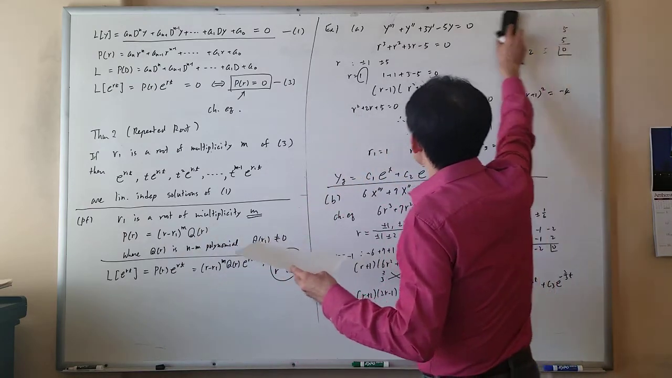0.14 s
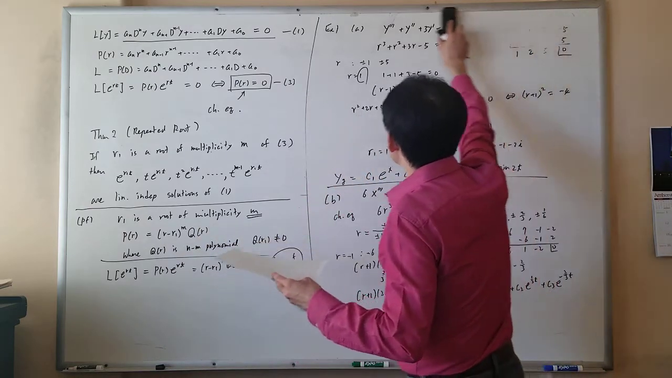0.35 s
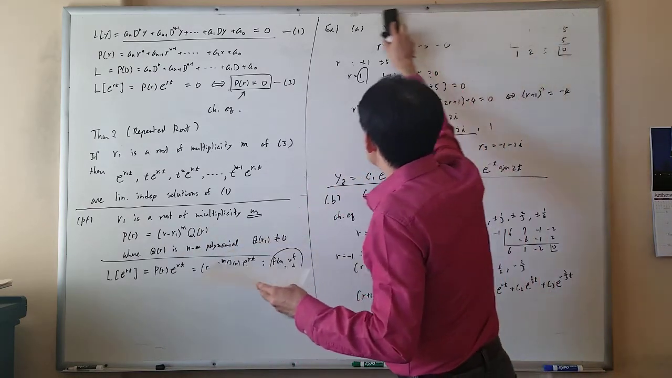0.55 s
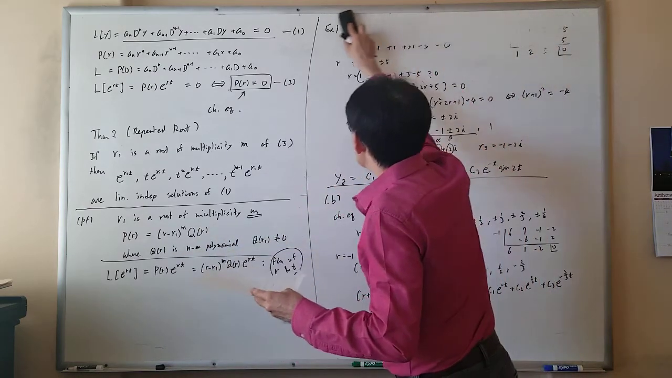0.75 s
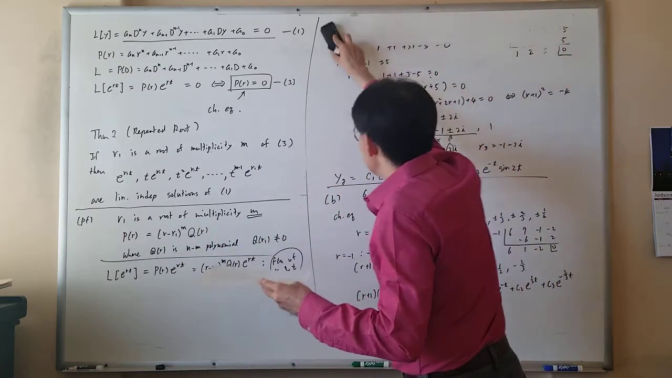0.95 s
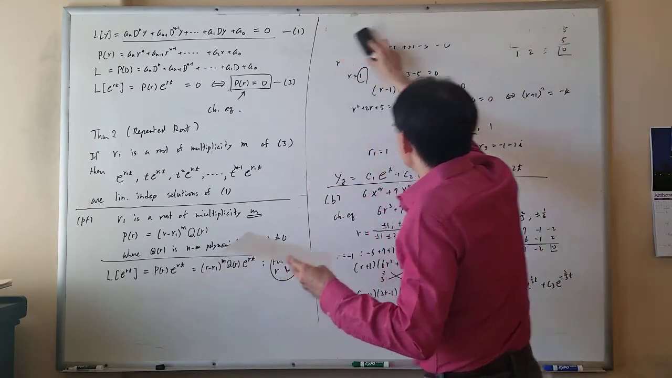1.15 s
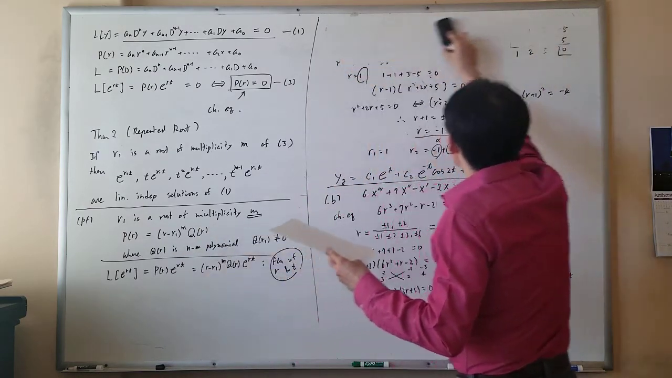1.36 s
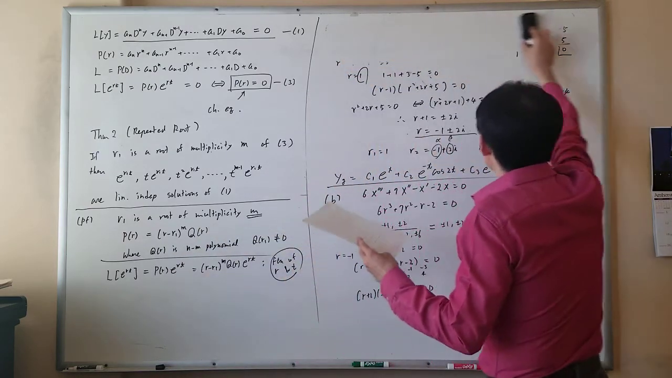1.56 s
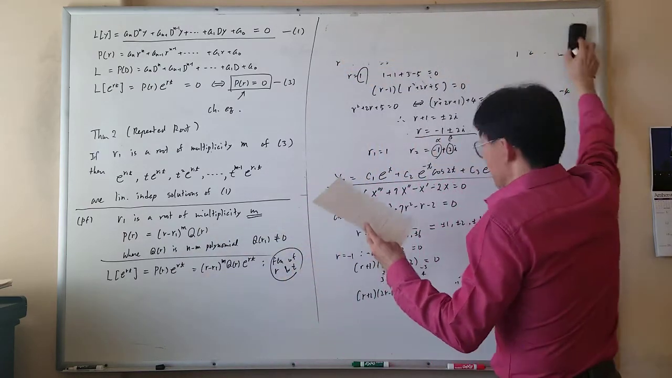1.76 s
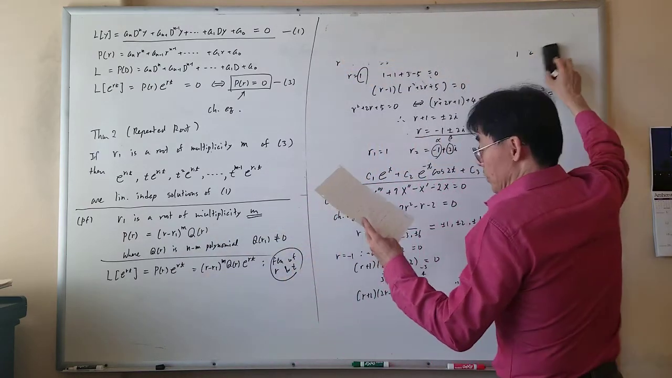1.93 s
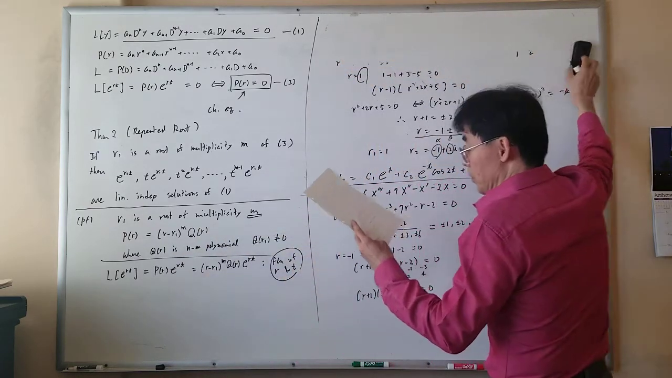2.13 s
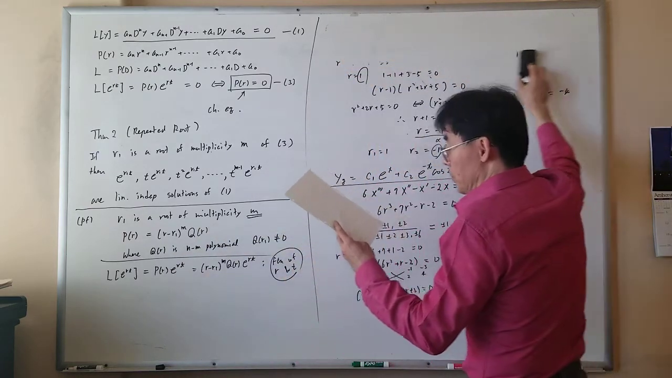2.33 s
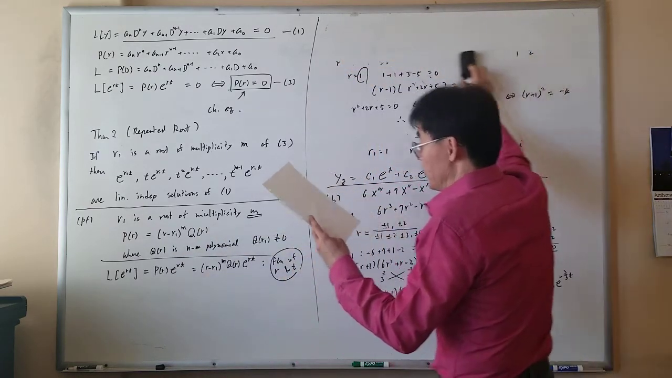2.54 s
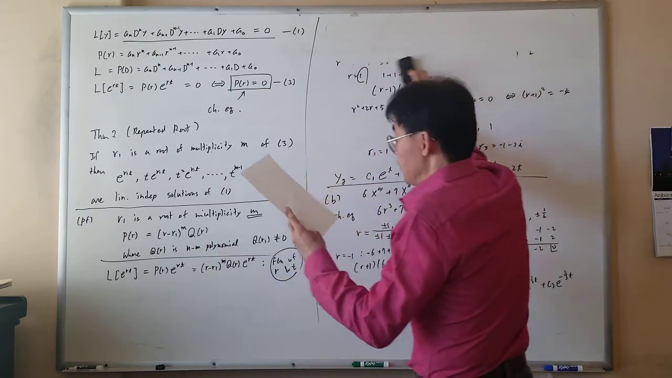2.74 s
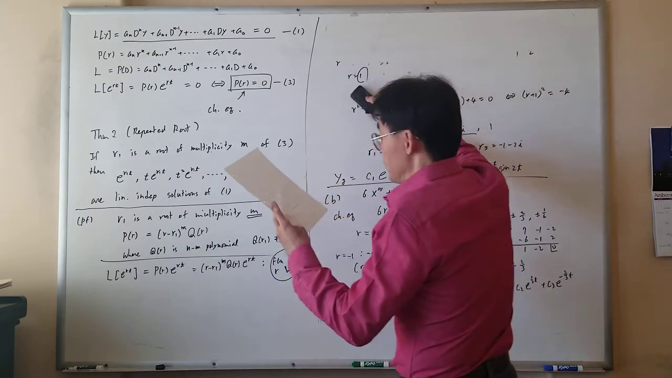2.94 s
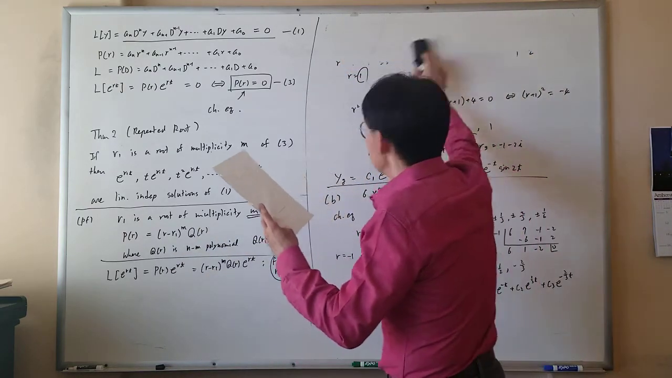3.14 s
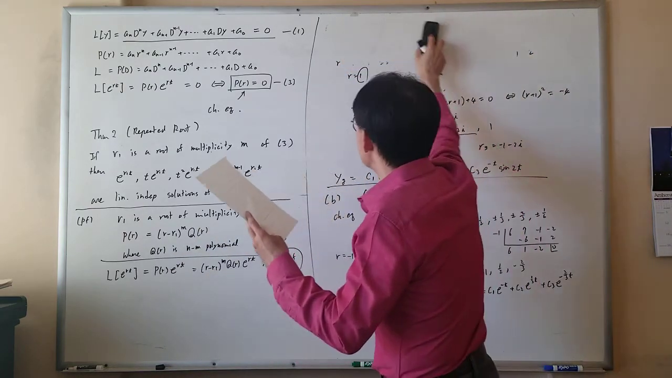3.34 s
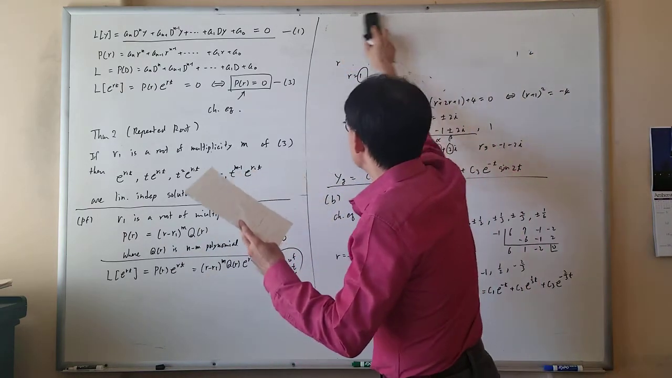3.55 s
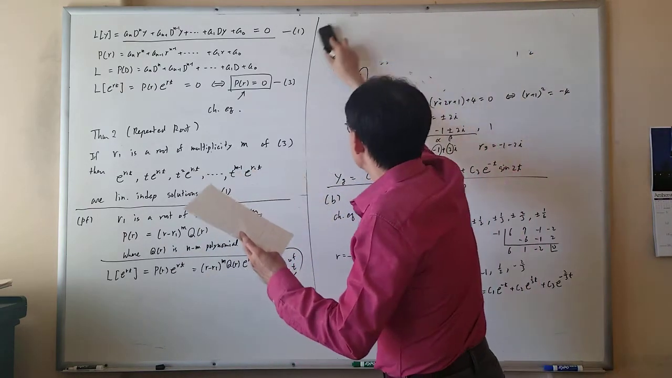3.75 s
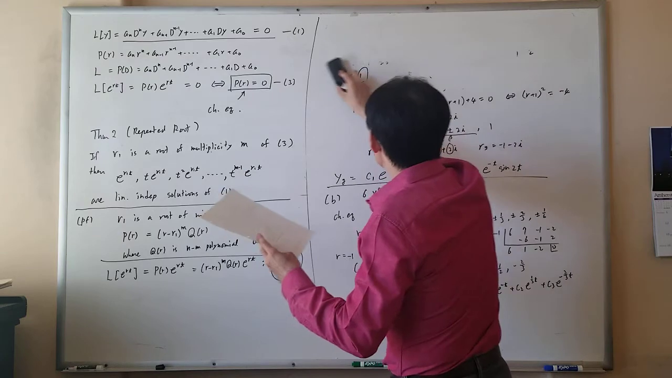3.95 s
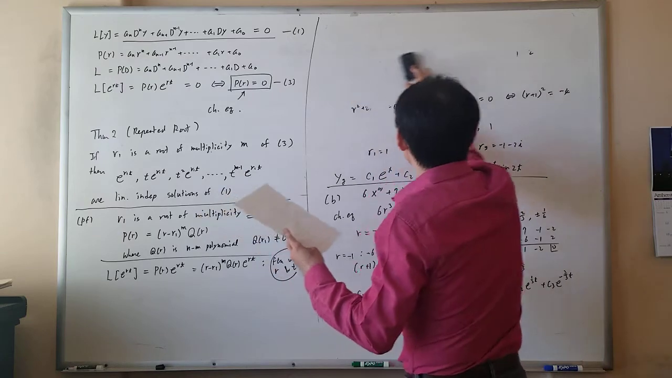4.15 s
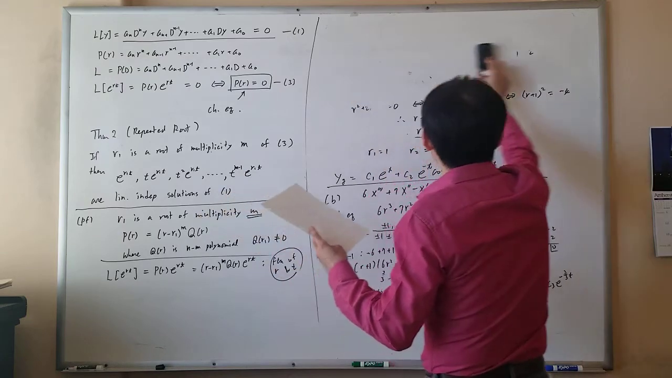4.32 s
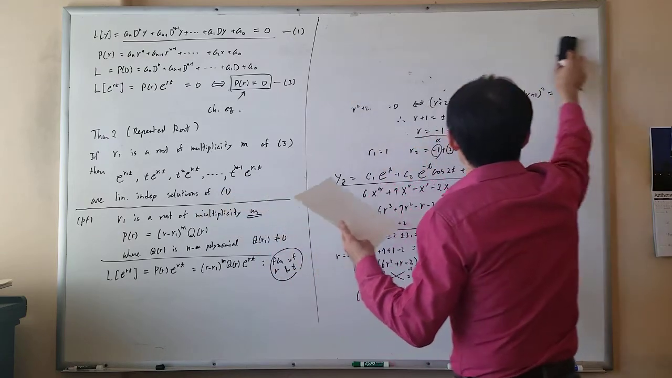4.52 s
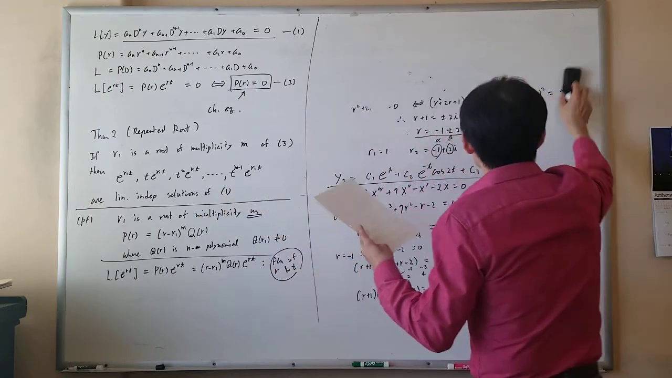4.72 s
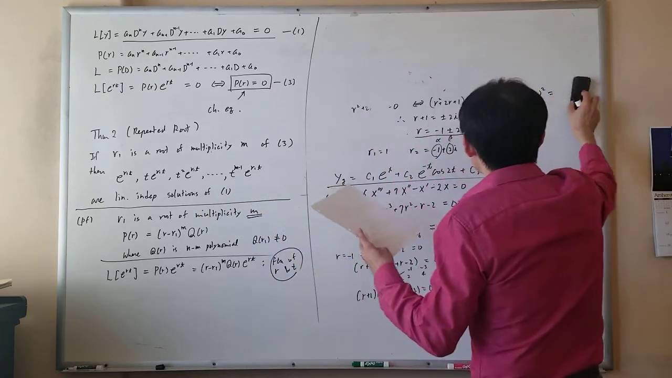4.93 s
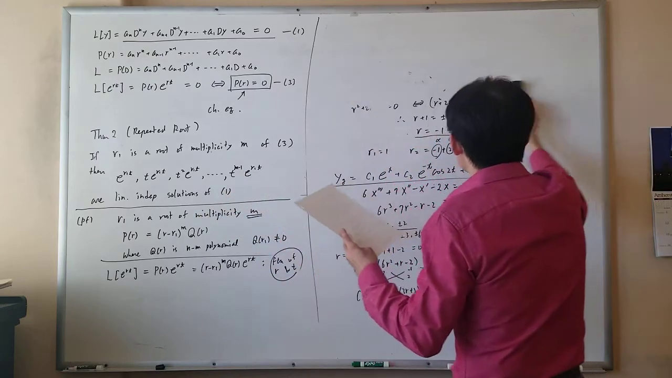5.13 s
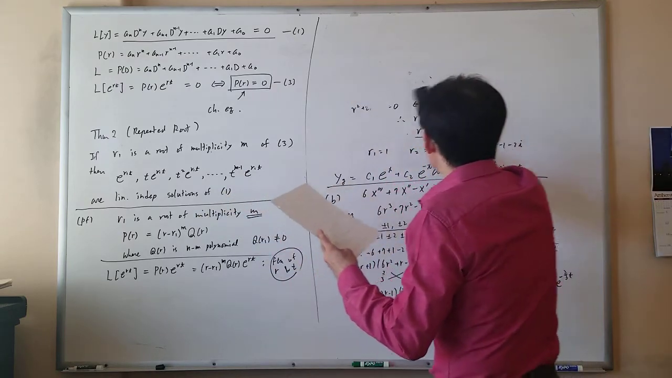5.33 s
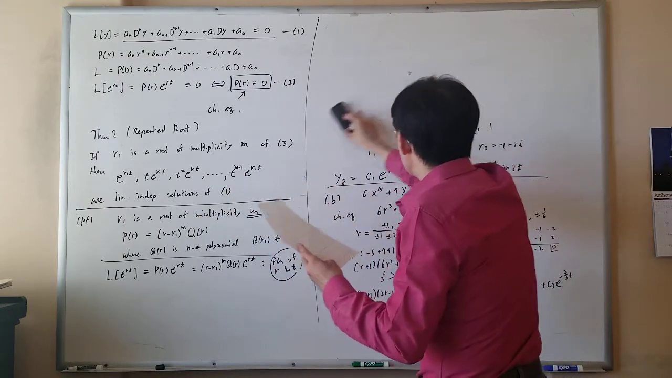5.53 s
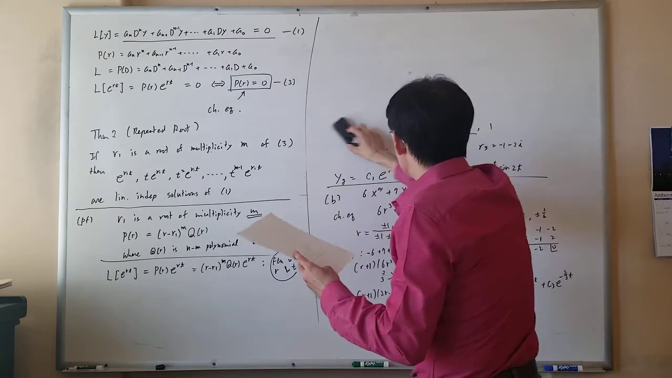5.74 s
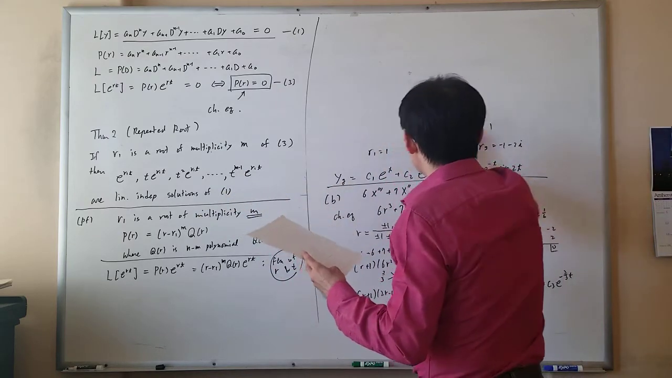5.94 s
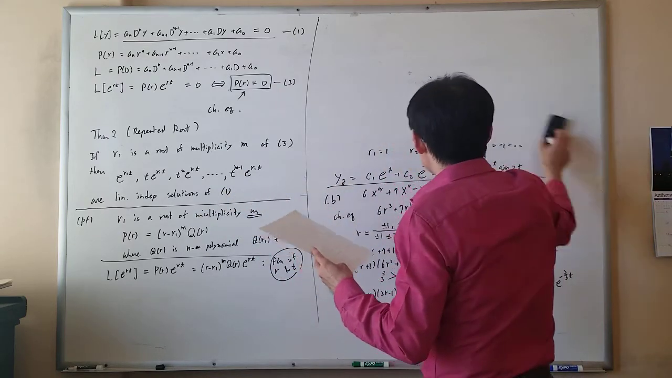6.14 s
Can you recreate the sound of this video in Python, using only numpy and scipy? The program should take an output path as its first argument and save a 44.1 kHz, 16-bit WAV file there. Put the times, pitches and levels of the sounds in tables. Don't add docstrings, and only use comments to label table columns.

```python
import sys
import numpy as np
from scipy import signal
from scipy.fft import rfft, irfft, next_fast_len
from scipy.io import wavfile
from scipy.ndimage import uniform_filter1d, map_coordinates

SR = 44100
rng = np.random.default_rng(int(sys.argv[2]) if len(sys.argv) > 2 else 0)


def decibels_to_gain(level_db):
    exponent = np.asarray(level_db, float) / 20
    return 10 ** exponent


def pcm_store(signal):
    levels = np.round(np.clip(np.atleast_2d(signal), -1, 1) * 32767)
    wavfile.write(sys.argv[1], SR, levels.astype(np.int16).T)


N = 272538
LANDING_S = 1.0045

# frequency in
# Hz, level in dB per Hz.
HISS_COLOUR = [(1000, -20), (1700, -9), (2450, -1.5), (3000, -4), (4600, -2.5), (5470, -3.5), (7000, -3.5),
               (8100, -6.5), (8600, -11), (9500, -12.5), (11500, -10), (13000, -15), (15800, -18.5)]
# frequency in Hz, level in dB per Hz.
BOARD_COLOUR = [(250, -12.5), (400, -10), (580, -4), (1100, -2), (1600, -2.5), (2600, -10.5)]
# start in seconds, length in seconds, felt level in dB, board level in dB,
# moment of greatest speed as a share of the length.
PUSHES = [(-.05, 1.036, -54.5, -70, 0.78), (0.865, 0.3, -60, -58.5, 0.36), (1.097, 0.61, -49, -66.5, 0.46),
          (1.402, .45, -49.5, -62, .58), (1.7, 0.54, -58.5, -72.5, 0.34), (2.124, 0.57, -54, -70, 0.56),
          (2.485, 0.61, -54, -72, 0.29), (2.944, 0.41, -57.5, -72, 0.42), (3.248, 0.64, -55, -72.5, 0.6),
          (3.683, 0.53, -53, -70, 0.49), (3.983, .69, -46, -64, 0.34), (4.544, 0.47, -56, -69.5, 0.51),
          (4.923, 0.38, -56, -71, .55), (5.1, 0.64, -48, -65.5, 0.51), (5.6, .3, -56, -70, 0.54),
          (5.722, .54, -47, -65, 0.51)]
# length in seconds, felt level in dB, board level in dB.
LANDING_PUSH = (.28, -49, -59.5)
# frequency in Hz, left minus right in dB.
PORT_DIFFERENCE = [(60, 1.0), (92, 0.5), (140, 0), (210, 1), (330, 1), (500, 0), (770, 0.5), (1170, 1.5),
                   (1790, 1), (2740, 1.5), (4190, 2), (6410, 5), (9810, -1), (15000, 1)]
# frequency in Hz, likeness from 0 to 1.
LIKENESS = [(60, 0.27), (300, 0.56), (700, 0.25), (1400, 0.014)]
# time in seconds, peak in dB, pitch in Hz.
TAPS = [
    (.9745, -43, 573),
    (.985, -45, 617),
    (1.013, -48, 478),
    (1.024, -51, 560),
]
# time in seconds, peak in dB, pitch in Hz, width as a share of the pitch.
THUDS = [(.295, -48.5, 400, 0.24), (0.3, -57, 290, .4), (.285, -58, 176, 0.45), (.89, -49, 570, 0.68),
         (.94, -54.5, 294, 0.8), (.945, -60, 850, 0.34), (.98, -66, 1490, 0.23), (4.94, -59, 310, 0.4),
         (4.975, -51, 450, .5), (4.97, -63, 240, 0.78), (4.989, -59, 970, 0.32)]
# time in seconds, peak in dB, pitch in Hz.
THUMPS = [
    (.395, -57.5, 95),
    (.49, -56, 89),
    (.973, -68, 98),
    (1.987, -58, 99),
    (3.04, -63, 51),
    (5.035, -57, 97),
    (5.055, -61, 318),
    (6.01, -63, 89),
]
# frequency in Hz, level in dB rms.
FAN_HUM = [(63, -84), (95, -78), (126.5, -79), (158, -86), (190, -92.5)]
# frequency in Hz, level in dB per Hz.
RUMBLE_COLOUR = [(15, -44), (25, -10), (67, -8), (113, 1.5), (144, -1), (210, -15.5), (270, -31),
                 (460, -120)]
# frequency in Hz, level in dB per Hz.
DUCT_COLOUR = [(150, -24), (210, -2), (300, -2), (420, -2), (600, -1), (900, 0.5)]
BAND_EDGES = np.array([5040, 6010, 7700, 9450, 12030])
BAND_HABITS = [(.91, 0.039, 0.03), (0.9, -0.17, -0.35), (.99, -0.37, -0.28), (0.98, -0.037, -0.22),
               (1.08, -0.1, .05)]
# start in seconds, length in seconds, opening time in seconds,
# release in dB at first, release in dB at last.
OPENINGS = [
    (-.1, 0.49, 0.11, 3.5, 10.5),
    (0.19, 0.672, 0.06, 17.5, 18),
    (1.199, 0.55, .13, 17, 16.5),
    (2.254, 0.44, 0.033, 4, 1),
    (3.443, 0.3, 0.13, 10.5, 9.5),
    (3.78, 0.3, 0.063, 9.5, 6),
    (3.956, 0.646, 0.093, 21, 20),
    (5.126, 0.53, 0.097, 21, 20),
    (5.764, 0.56, 0.11, 22.5, 22.5),
]
# start in seconds, length in seconds, band in Hz,
# side (-1 left, +1 right), share of the release withheld.
HELD_BANDS = [(.24, 0.82, 10600, -1, 0.89), (0.276, 0.66, 5400, -1, 0.66), (.22, 0.72, 13600, 1, 1.7),
              (0.797, 0.091, 8500, -1, 1.3), (5.2, 0.046, 13600, -1, .5), (1.18, .14, 8500, -1, .6),
              (1.252, 0.44, 5400, -1, 0.59), (1.28, .31, 5400, 1, .35), (1.292, .085, 6700, -1, 0.76),
              (1.62, .16, 8500, -1, 0.61), (1.64, .14, 6700, -1, 0.57), (1.66, .12, 8500, 1, 0.79),
              (3.42, 0.49, 13600, 1, 1.1), (3.42, 0.52, 10600, -1, 1.7), (3.42, 0.59, 8500, -1, 0.81),
              (3.42, 0.092, 13600, -1, .9), (3.87, .08, 13600, -1, 0.63), (3.94, .11, 8500, 1, .5),
              (5.12, .53, 5400, -1, 0.49), (5.12, .16, 13600, 1, .8), (5.12, .13, 10600, 1, .5),
              (5.12, 0.29, 5400, 1, .65), (5.528, .11, 5400, 1, .65), (5.8, 0.11, 5400, -1, 0.37)]
# start in seconds, length in seconds, band in Hz,
# side (-1 left, +1 right), lift in dB.
LEAKING_BANDS = [(.1, 0.6, 6700, 1, 2.5), (.1, 0.96, 8500, 1, 3), (.77, 0.076, 10600, 1, 1.5),
                 (0.792, 0.48, 5400, 1, 4.5), (1.22, 0.066, 13600, 1, 12.5), (1.63, .12, 13600, 1, 5),
                 (1.267, 0.34, 10600, 1, 5.5), (1.31, 0.46, 13600, -1, 5), (2.29, 0.039, 13600, -1, 10),
                 (2.327, .46, 6700, -1, 4), (2.42, 0.14, 5400, 1, 10), (2.62, 0.17, 6700, -1, 3.5),
                 (5.165, 0.023, 13600, -1, 2), (2.532, .3, 10600, 1, 14.5), (2.68, .055, 10600, -1, 10),
                 (2.71, .12, 5400, 1, 7.5), (3.41, 0.09, 5400, -1, 9), (3.51, 0.53, 10600, 1, 9.5),
                 (3.566, .14, 13600, -1, 8), (3.48, 0.25, 8500, 1, 4.5), (3.76, 0.24, 5400, 1, 3),
                 (3.96, 0.06, 13600, -1, 10), (5.6, 0.11, 8500, 1, 6), (4.74, 0.066, 5400, -1, 5.5)]


def unit(x):
    return x / np.sqrt(np.mean(x ** 2) + 1e-20)


def along(points, hz):
    f, v = np.transpose(points)
    return np.interp(np.log(hz + 1), np.log(f + 1), v)


def wobble(rate):
    knots = rng.standard_normal(int(N * rate / SR) + 4)
    return map_coordinates(knots, [np.arange(N) * rate / SR])


def filtered(x, response):
    m = next_fast_len(N + 8192)
    return irfft(rfft(x, m) * response(np.fft.rfftfreq(m, 1 / SR)), m)[..., :N]


def diffuse(pair, spectrum):
    points = [(3.7, -120), *spectrum, (21000, -69)]

    def mix(hz):
        turn = np.arccos(np.clip(along(LIKENESS, hz), -1, 1)) / 2
        return decibels_to_gain(along(points, hz)) * [np.cos(turn), np.sin(turn)]

    mid, side = filtered(pair, mix)
    return unit(np.array([mid + side, mid - side]))


def eraser():
    felt_db, board_db = rubbing()
    fine_clumps = np.array([wobble(1500), wobble(1600)])
    clumps_db = 1.02 * wobble(12) + 0.3 * wobble(250) + 0.95 * fine_clumps
    slips = unit(decibels_to_gain(clumps_db) * rng.standard_normal((2, N)))
    hiss = decibels_to_gain(felt_db + 3.5) * diffuse(slips, HISS_COLOUR)
    panel = diffuse(rng.standard_normal((2, N)), BOARD_COLOUR)
    body = decibels_to_gain(board_db + 3.0 + 1.5 * wobble(8)) * panel
    heard = filtered(hiss + body, lambda hz: decibels_to_gain(np.outer([0.5, -0.5], along(PORT_DIFFERENCE, hz) - 2)))
    place_db = 2.3
    return heard * decibels_to_gain(np.outer([0.5, -0.5], place_db))


def rubbing():
    speed_power, resting_db = 1.154, -69
    board_late = 0.13
    board_shift_db = 14
    t = np.arange(0, N, 32) / SR
    power = decibels_to_gain(2 * resting_db)
    for start, length, felt_db, board_db, fastest in [*PUSHES, (LANDING_S, *LANDING_PUSH, 0)]:
        tops = np.clip([fastest, fastest + board_late * (1 - fastest)], 0.003, 0.995)
        swell = np.array([np.interp((t - start) / length, [0, top, 1], [0, 1, 0]) for top in tops])
        speed = np.sin(np.pi / 2 * swell)
        loudness = decibels_to_gain([[felt_db], [board_db + board_shift_db]]) * speed ** speed_power
        power = power + loudness ** 2
    level_db = 10 * np.log10(power) - [[0], [board_shift_db]]
    return np.repeat(level_db, 32, axis=1)[:, :N]


def slap():
    t = np.maximum(np.arange(N) / SR - LANDING_S, 0)
    burst = (t > 0) * decibels_to_gain(-36 - 60 * t / 0.013) * rng.standard_normal((2, N))
    return filtered(burst, lambda hz: 1 / (1 + (2800 / (hz + 1)) ** 4) / (1 + (hz / 8500) ** 6))


def knocks():
    # width as a share of pitch (thuds have their own), rise s, time to fall 60 dB s
    every = [(*row, 0.042, 0.0013, 0.088) for row in TAPS]
    every += [(*row, 0.051, 0.38) for row in THUDS]
    every += [(*row, 0.08, 0.013, 0.34) for row in THUMPS]
    out = np.zeros((2, N + SR))
    t = np.arange(SR // 3) / SR
    for start, db, hz, width, rise, t60 in every:
        own, shared = rng.standard_normal((2, 2, 250)) + 1j * rng.standard_normal((2, 2, 250))
        echoes = np.sqrt(width) * (0.31 * own + 1.46 * shared[0]) + 0.83 * (1 - width)
        spread = np.array([np.interp(t * hz * width, np.arange(250), e) for e in echoes])
        ring = np.real(spread * np.exp(2j * np.pi * hz * t))
        shape = (1 - np.exp(-(t / rise) ** 2)) * decibels_to_gain(db - 60 * t / t60)
        out[:, round(start * SR):][:, :len(t)] += ring * shape
    return out[:, :N] * decibels_to_gain([[1.2], [-1.2]])


def ventilation():
    t = np.arange(N) / SR
    fan = np.zeros(N)
    for hz, db in FAN_HUM:
        level = decibels_to_gain(db + 1.0 + 4.3 * wobble(4.98))
        fan += level * np.sin(2 * np.pi * hz * t + 0.66 * wobble(4.5))
    rumble = diffuse(rng.standard_normal((2, N)), RUMBLE_COLOUR[1:-1])
    rumble = decibels_to_gain(-74.5 + 2 * wobble(3.3)) * rumble
    duct = diffuse(rng.standard_normal((2, N)), DUCT_COLOUR)
    duct = decibels_to_gain(-79.0 + 1.1 * wobble(4.7)) * duct
    lull_db = -11 * np.exp(-((t - 0.18) / 0.11) ** 2)
    return decibels_to_gain(lull_db) * (fan + rumble) + duct


def scene():
    return eraser() + slap() + knocks() + ventilation()


def release(late, early):
    shut_s = 0.089
    t = np.arange(N) / SR
    landing = (LANDING_S, 0.23, 0, 13.5, 16)
    ramps = []
    for start, length, opening, first_db, last_db in [*OPENINGS, landing]:
        drift_s = max(length - (1 + late) * opening - (1 + early) * shut_s, 0)
        corners = np.cumsum([start + late * opening, opening, drift_s, shut_s])
        ramps.append(np.interp(t, corners, [0, first_db, last_db, 0]))
    return np.max(ramps, axis=0)


def spans(rows):
    out = np.zeros((len(BAND_EDGES), 2, N))
    for start, length, hz, side, value in rows:
        band = np.searchsorted(BAND_EDGES, hz) - 1
        out[band, int(side > 0), round(start * SR):round((start + length) * SR)] += value
    return uniform_filter1d(out, round(0.024 * SR))


def suppressor(x):
    edges = np.asarray(BAND_EDGES)
    common_db = np.array([[share * release(late, early)] for share, late, early in BAND_HABITS])
    lift_db = common_db * (1 - spans(HELD_BANDS)) + spans(LEAKING_BANDS)
    ajar = np.clip(lift_db * (18.5 - lift_db) / 110, 0, 1)
    lift_db += 2.17 * ajar * np.array([[wobble(14), wobble(17)] for _ in edges])
    above = filtered(x, lambda hz: np.clip((hz - edges[:, None, None]) / 110 + 0.5, 0, 1))
    bands = above - np.append(above[1:], [0 * x], axis=0)
    return x - above[0] + np.sum(decibels_to_gain(lift_db) * bands, axis=0)


def top_cut(x):
    return signal.sosfilt(signal.butter(12, 16660, fs=SR, output="sos"), x)


def record(dry):
    top_hz = 15750
    mix = filtered(suppressor(dry), lambda hz: hz < top_hz)
    return top_cut(mix)


dry = scene()
out = record(dry)
pcm_store(out)
```